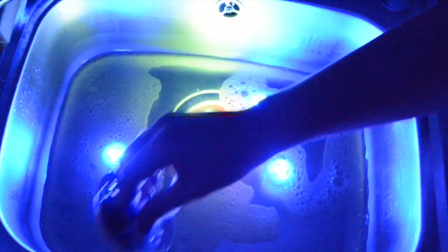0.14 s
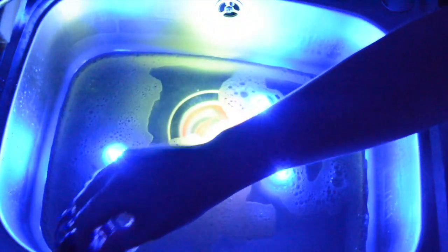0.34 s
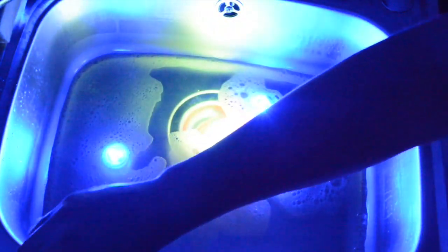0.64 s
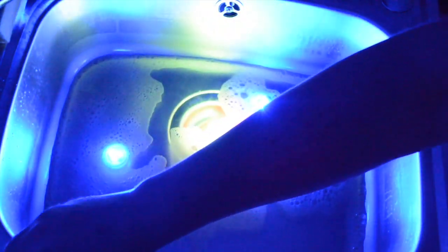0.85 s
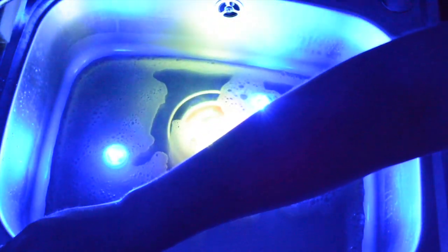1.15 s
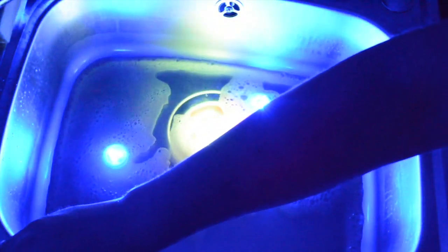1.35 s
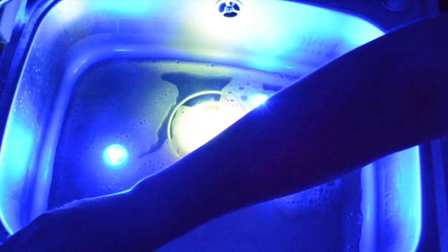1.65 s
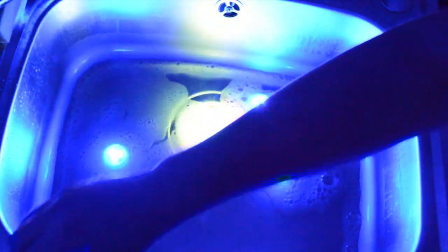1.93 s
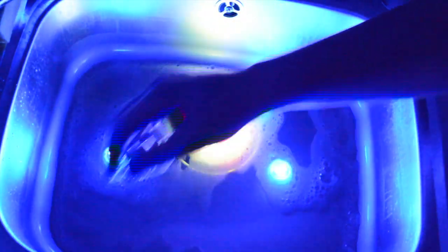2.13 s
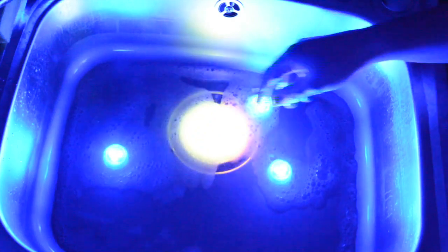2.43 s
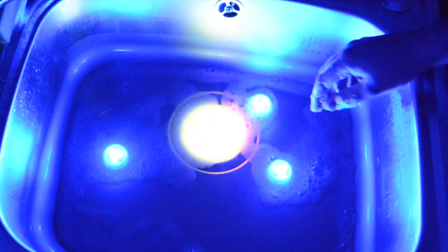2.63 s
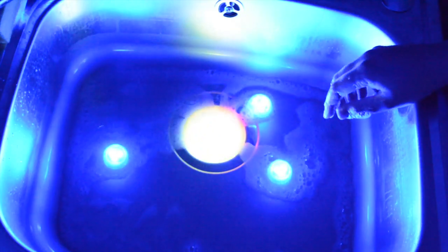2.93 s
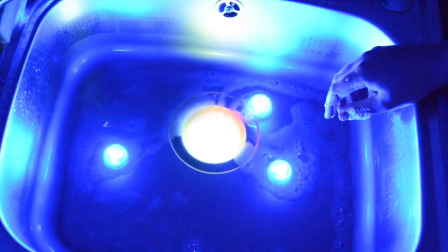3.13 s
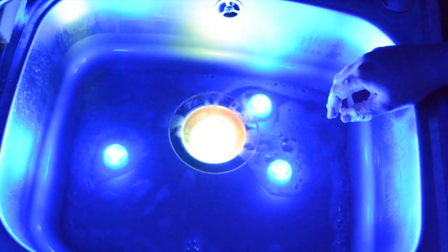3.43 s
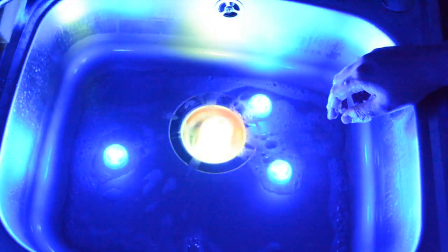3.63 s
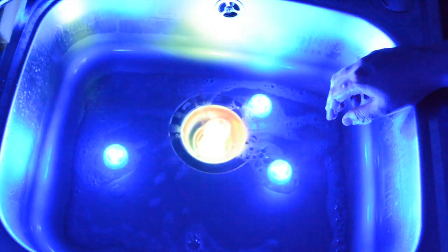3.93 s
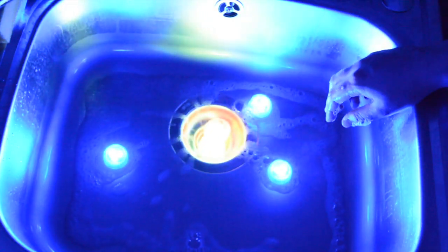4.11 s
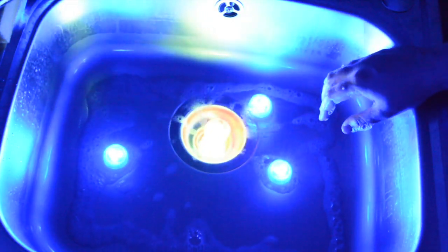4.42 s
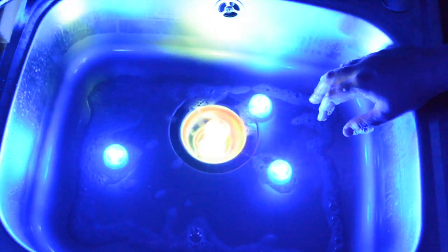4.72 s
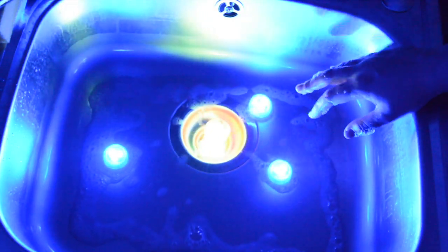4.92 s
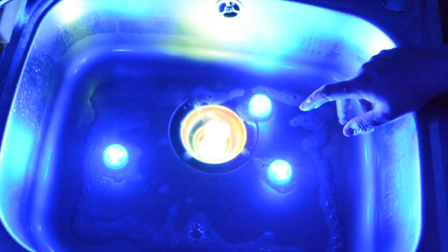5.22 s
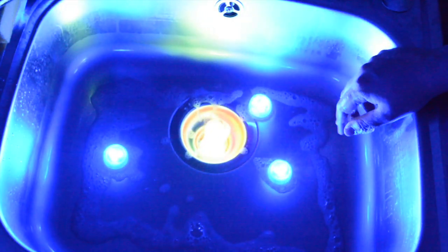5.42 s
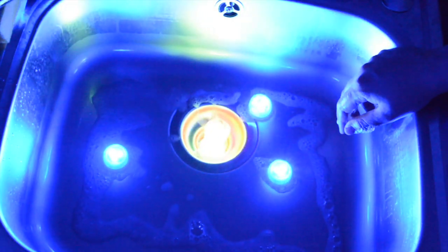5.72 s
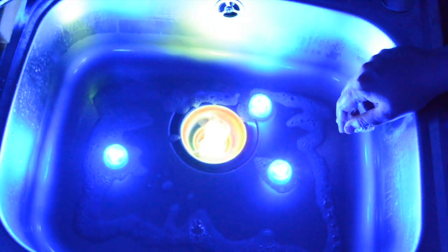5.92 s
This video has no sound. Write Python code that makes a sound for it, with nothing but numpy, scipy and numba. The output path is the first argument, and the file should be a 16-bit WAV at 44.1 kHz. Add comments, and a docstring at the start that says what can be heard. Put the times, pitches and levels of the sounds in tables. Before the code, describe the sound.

A kitchen basin empties, heard close and slightly to one side, with the sound leaning right. Burbling flow and fine spray resonate in the pipe while foam faintly fizzes. A short metallic scrape ends in a booming clank, followed later by a small double knock. As the water runs out, rapid deep glugs and splashy slurps peak, then thin into isolated gulps, tiny drips and a low final slug.

```python
"""Soapy water runs down the plughole of a steel sink, heard from close above and a little to one side.
From the start, bubbles and spray ring the air modes of the waste pipe, over a low rumble and fizzing foam.
Early on the plug scrapes and knocks on the drainer: friction and impacts excite the modes of a steel sheet.
As the basin empties the trap gulps air: each pocket is a decaying sine with filtered splashes of noise.
Late drips, ticks, sparse gulps and one deep slug of water remain over the shaped noise of the kitchen."""
import sys
import numpy as np
from scipy import signal
from scipy.fft import rfft, irfft, next_fast_len
from scipy.io import wavfile
from scipy.ndimage import uniform_filter1d, map_coordinates
from numba import njit

SR = 44100
rng = np.random.default_rng(int(sys.argv[2]) if len(sys.argv) > 2 else 0)


def output_pcm(signal):
    """Save a mono or channel-first signal as 16-bit PCM at the path in sys.argv[1].

    Samples are clipped to [-1, 1] before scaling.
    """
    pcm = np.clip(np.atleast_2d(signal).T, -1, 1) * 32767
    wavfile.write(sys.argv[1], SR, np.round(pcm).astype(np.int16))


N = 267246

# air modes over the emptied trap: (frequency [Hz], bandwidth [Hz], relative level [dB])
TRAP_MODES = [(174, 45, -0.5), (257, 49, -1.5), (362, 101, -3.5), (498, 43.4, 2), (710, 49, -10.5),
              (800, 66, -10), (1230, 86, -4), (1415, 80, -3.5), (1910, 72, -2.5), (2140, 620, -11),
              (2340, 112, -4), (2760, 58, -11.5)]
# single bubbles that stand out of the stream: (time [s], level [dB], frequency [Hz])
PLOP_EVENTS = [(0.0362, -30, 2090), (0.17, -25.5, 3230), (0.203, -30.5, 2350), (0.2843, -36.5, 2220),
               (0.58, -35, 462), (0.7235, -23.5, 2390), (1.137, -33, 461), (1.231, -32.5, 2780),
               (1.4599, -25.5, 2160), (1.4769, -26, 2094), (1.561, -28.5, 677), (1.76, -28, 490),
               (1.9021, -32, 2400), (2.131, -36.5, 505), (2.3411, -29.5, 2200), (2.46, -31.5, 485),
               (2.531, -33, 2200), (2.564, -30.5, 4050), (2.657, -33.5, 497), (2.6564, -23.5, 2240),
               (2.684, -30.5, 518), (2.7919, -34, 1950), (3.0388, -30.5, 4400), (3.0668, -27, 2240),
               (3.1488, -31, 4320)]
# delay of the left channel, a little over one sample: (weight per sample of delay)
LEFT_LAG = [0, .8, .2]
# groups of air modes: (from [Hz], to [Hz])
LOW_MODES_HZ, THROAT_MODES_HZ, HIGH_MODES_HZ = (0, 1000), (1000, 1600), (1600, 20000)


def undb(db):
    """Logarithmic level: the amplitude gain of a dB value."""
    return 10 ** (np.asarray(db) / 20)


def level(x, db):
    """Root-mean-square normalisation: scale x to an rms level in dB."""
    return x * undb(db) / np.sqrt(np.mean(x ** 2))


def curve(s, values):
    """Linear interpolation: straight lines between timed values, one value per sample."""
    return np.interp(np.arange(N) / SR, s, values)


def envelope(table):
    """Exponential envelope: gain whose dB level runs straight between rows of (time [s], level [dB])."""
    return undb(curve(*np.transpose(table)))


def butterworth(x, order, hz, kind):
    """Maximally flat filter: pass the low, high or band part of x."""
    return signal.lfilter(*signal.butter(order, hz, kind, fs=SR), x)


def resonate(x, hz, width_hz):
    """Second-order resonance: a band-pass with gain 1 at the centre."""
    return signal.lfilter(*signal.iirpeak(hz, hz / width_hz, fs=SR), x)


def decay(x, t60):
    """Exponential relaxation: each impulse of x dies by 60 dB in t60 s."""
    return signal.lfilter([1], [1, -np.exp(-np.log(1000) / (t60 * SR))], x)


def coloured(points):
    """Spectral shaping: noise of rms 1 from rows of (frequency [Hz], relative level [dB])."""
    hz, db = np.transpose(points)
    size = next_fast_len(N)
    bins_hz = np.arange(size // 2 + 1) * SR / size + 1  # 1 Hz up, to keep the logarithm finite
    gain = undb(np.interp(np.log(bins_hz), np.log(hz), db))
    spectrum = rfft(rng.standard_normal(size)) * gain
    return level(irfft(spectrum, size)[:N], 0)


def walk(rate):
    """Slow random modulation: Gaussian levels drawn rate times a second, joined by slopes."""
    k = int(SR / rate)
    steps = np.repeat(rng.standard_normal(N // k + 1), k)
    return uniform_filter1d(steps, k)[:N]


@njit
def rings(n, sr, start, hz, t60, size, glide, rise):
    """Damped oscillation: sines swell over rise s and shift pitch by the share glide while fading 60 dB."""
    out = np.zeros(n)
    for k in range(len(start)):
        length = int(t60[k] * sr)
        z, i0 = size[k] + 0j, int(start[k] * sr)
        # p turns and shrinks the phasor by one sample; turn shifts its frequency
        p = np.exp(2j * np.pi * hz[k] / sr - np.log(1000) / length)
        turn = np.exp(2j * np.pi * hz[k] * glide / sr / length)
        for i in range(i0, min(i0 + length, n)):
            out[i] += z.imag * min((i - i0) / (rise * sr), 1.)
            z *= p
            p *= turn
    return out


def bubbles(count, lo_hz, hi_hz, cycles, spread_db):
    """Bubble resonance: a swarm at random moments, each fading 60 dB in so many cycles, a few louder."""
    moment, pitch, strength = rng.random((count, 3)).T
    hz = lo_hz * (hi_hz / lo_hz) ** pitch
    size = undb(spread_db * np.minimum(-np.log(strength), 3.5))
    return level(rings(N, 1. * SR, moment * N / SR, hz, cycles / hz, size, 0.22, 0.00033), 0)


def struck(table, glide, rise):
    """Free vibration: rings from rows of (time [s], level [dB], frequency [Hz], t60 [s])."""
    s, db, hz, t60 = np.array(table, float).T.copy()
    return rings(N, 1. * SR, s, hz, np.clip(t60, .005, 1), undb(db), glide, max(rise, 1e-4))


def bursts(s, db, t60, crack):
    """Impulsive excitation: a click of size crack and a decaying puff of noise at each given moment."""
    marks = np.zeros(N)
    marks[(np.array(s) * SR).astype(int)] = undb(db)
    return crack * marks + decay(marks, t60) * rng.standard_normal(N)


def ring(modes, drive, lo_hz, hi_hz, flicker_db, fade_db=0):
    """Modal superposition: unevenly fed air modes between two limits, neighbours alternating in sign."""
    fading_rows = (10, 12)  # the modes that follow fade_db
    total = 0
    for k, (hz, width_hz, db) in enumerate(modes):
        if lo_hz < hz < hi_hz:
            feed_db = db + flicker_db * walk(21.93) + fade_db * (k in fading_rows)
            total = total + (-1) ** k * resonate(drive * undb(feed_db), hz, width_hz)
    return total


def bend(x, swing_s):
    """Time-varying delay: reading x at a wandering place makes its pitches drift up and down."""
    wander = swing_s * SR * uniform_filter1d(walk(25.), size=900)
    return map_coordinates(x, [np.arange(N) + wander], mode="mirror")


def stream():
    """Cavity resonance: bubbles churn in low pipe modes and spray in high ones, beside a basin rumble."""
    # air modes of waste pipe and plughole: (frequency [Hz], bandwidth [Hz], relative level [dB])
    pipe_modes = [(234.7, 10.7, -9.5), (349.7, 35.4, -3.5), (479.6, 42, 6.5), (518.5, 53.6, 5),
                  (704.6, 28.8, 5), (778, 46.4, -2.5), (924, 53, -10.5), (1150, 47, -0.5), (1371, 80, 0),
                  (2139, 155, -10.5), (2363, 50, -5), (2590, 200, -15), (3270, 98, -9), (4050, 126, -12),
                  (4550, 144, -14), (5608, 140, -12), (6765, 170, -19.5), (7400, 124, -19.5),
                  (8220, 530, -30), (9500, 296, -39), (11900, 800, -35), (13600, 680, -40.5)]
    # big bubbles churning in the pipe: (time [s], level [dB])
    churn_levels = [(0, -45), (1.5, -44.5), (1.9, -41.5), (2.5, -45.5), (2.78, -49.5), (3.3, -51),
                    (3.45, -51), (3.68, -48.5), (3.725, -53), (3.76, -46.5), (4.1, -50), (4.2, -65),
                    (4.5, -66.5), (4.75, -74), (6.06, -90)]
    # upper low modes, which fade as the water sinks: (time [s], level over the churn [dB])
    neck_levels = [(0, -4), (1.2, -4), (3.3, -6.5)]
    # modes of the plughole throat: (time [s], level over the churn [dB])
    throat_levels = [(0, -14), (1.2, -10), (2.2, -13), (2.7, -6), (3.3, -7), (3.5, -20), (4.2, -7.5),
                     (6.06, -14)]
    # fine spray, falling away when the basin runs empty: (time [s], level [dB])
    spray_levels = [(0, -46), (.4, -46), (1.3, -49), (2.1, -47.5), (2.7, -51), (3.24, -50.5), (3.34, -61),
                    (3.6, -66), (4.3, -72)]
    # spectrum of the basin rumble: (frequency [Hz], relative level [dB per Hz])
    rumble_spectrum = [(12, -71), (43, -6.5), (86, -0.5), (114, -1), (171, -16.5), (237, -7), (282, -20),
                       (320, -18), (420, -26.5), (700, -120)]
    # rumble of the basin: (time [s], level [dB])
    rumble_levels = [(0, -47), (.76, -42), (1.3, -42.5), (1.75, -42.5), (2.0, -39.5), (2.15, -45),
                     (2.7, -43.5), (2.8, -47.5), (3.38, -47), (3.49, -34.5), (3.6, -38.5), (3.72, -40),
                     (3.8, -42), (4.05, -35), (4.2, -46.5), (4.75, -59.5), (6.06, -74.5)]
    neck_hz, swirl_s = 600, .0002
    # two modes sink away once air breaks through the plughole
    air_in_s, air_in_db = (2.71, 2.76), -4.5

    surge, flow = walk(13.0), slaps()
    big = bubbles(count=700, lo_hz=200.6, hi_hz=1680.0, cycles=28.0, spread_db=3.0)
    churn = (big + undb(14.0) * rng.standard_normal(N)) * undb(0.67 * surge) * flow
    fine = bubbles(count=7000, lo_hz=1766.0, hi_hz=14570.0, cycles=34.0, spread_db=2.0)
    spray = (fine + undb(1.5) * rng.standard_normal(N)) * undb(0.48 * surge) * flow ** 1.15

    low = level(ring(pipe_modes, churn, LOW_MODES_HZ[0], neck_hz, 0.57), 0)
    neck = level(ring(pipe_modes, churn, neck_hz, LOW_MODES_HZ[1], 0.6), 0) * envelope(neck_levels)
    throat = level(ring(pipe_modes, churn, *THROAT_MODES_HZ, 3.6), 0) * envelope(throat_levels)
    high = ring(pipe_modes, spray, *HIGH_MODES_HZ, 1.8, curve(air_in_s, [0, air_in_db]))
    high = level(bend(high, swirl_s), 0)  # the moving water surface bends the modes
    water = envelope(churn_levels) * (low + neck + throat) + envelope(spray_levels) * high

    # partly unrelated left and right
    shared = coloured(rumble_spectrum)
    left = undb(-3.0) * (shared + 0.94 * coloured(rumble_spectrum))
    right = shared + 1.25 * coloured(rumble_spectrum)
    unsteady = undb(2.1 * surge + 1.45 * walk(5.58))
    return water, np.array([left, right]) * envelope(rumble_levels) * unsteady


def slaps():
    """Impulse and relaxation: steady flow strength jumps at each wall slap and plop, then fades quickly."""
    slaps_per_s, slap_db, spread_db, t60_s = 80, -7, 4.5, 0.027
    plop_slap_db = 27  # jump at a plop, above the plop's own table level
    moment, strength = rng.random((int(slaps_per_s * N / SR), 2)).T
    s, db, _ = np.transpose(PLOP_EVENTS)
    marks = np.zeros(N)
    marks[(moment * N).astype(int)] = undb(slap_db + spread_db * np.minimum(-np.log(strength), 2.5))
    marks[(s * SR).astype(int)] = undb(db + plop_slap_db)
    return 1 + decay(marks, t60_s)


def plops():
    """Bubble resonance: single damped sines, the small high ones dying sooner."""
    s, db, hz = np.transpose(PLOP_EVENTS)
    t60 = 0.038 * (hz / 1000) ** -0.9  # 0.038 s at 1 kHz
    return struck(np.transpose([s, db, hz, t60]), 0.011, 0.0017)


def trap():
    """Air-pocket resonance: each gulp thumps, sloshes in low trap modes and spits into upper ones."""
    # air pockets swallowed by the trap, levels relative within each column:
    # (time [s], thump level [dB], pocket frequency [Hz], splash level [dB], spit level [dB])
    gulps = [(3.28, -31, 240, -29, -54), (3.336, -24.5, 83, -39, -35), (3.409, -20.5, 98, -21.5, -32),
             (3.444, -19.5, 88, -24.5, -29), (3.462, -20, 88.0, -23.5, -33),
             (3.52, -22.5, 118.0, -26, -28.5), (3.552, -36, 155.0, -23.5, -42),
             (3.617, -21.5, 152, -25, -49), (3.639, -24, 118, -23.5, -39), (3.673, -30, 133.0, -25.5, -49),
             (3.736, -16, 157, -16.5, -45), (3.777, -22, 173.0, -22.5, -67), (3.8, -17.5, 143, -33, -35.5),
             (3.818, -21, 73, -18, -46), (3.846, -22, 138, -20.5, -42), (3.879, -26, 226.0, -34.0, -43),
             (3.898, -22.5, 191.0, -26, -45), (3.929, -23.5, 170, -28.5, -41),
             (3.951, -24, 154, -29, -38.5), (3.985, -27, 151.0, -21, -34.0), (4.008, -18, 173.0, -18, -43),
             (4.034, -11.5, 168, -22.5, -35), (4.049, -15, 183, -37, -31), (4.09, -20.5, 142, -47, -43),
             (4.11, -30, 72.4, -26.5, -44), (4.134, -21.5, 115, -47.5, -43),
             (4.241, -21.5, 140, -28.5, -34), (4.26, -22, 122, -35, -34), (4.354, -26, 241, -27.5, -40.0),
             (4.385, -25, 205, -36, -43), (4.406, -25, 138, -35, -41), (4.438, -30, 110, -38, -52),
             (4.502, -43, 163.0, -47, -39.5), (4.635, -51, 104.0, -42.5, -40), (4.81, -37, 222, -41, -47),
             (4.84, -37.5, 235, -43, -48), (5.037, -48, 254, -47, -59), (5.29, -70, 230, -55.5, -48),
             (5.409, -32, 102, -61, -65), (5.498, -45, 74.0, -47.5, -64), (5.52, -38, 247, -71.5, -50.5),
             (5.814, -56, 81, -49, -55), (5.853, -44.5, 217, -61, -50)]
    thump_t60_s, wobble_s = 0.084, 0.00031
    slosh_db, slosh_t60_s = -16, 0.21  # water washing about after each gulp
    s, db, hz, splash_db, spit_db = np.transpose(gulps)

    def wash(burst_db, t60, crack):
        """Impulsive excitation: a splash followed by a weaker, longer, unsteady slosh."""
        splash = bursts(s, burst_db, t60, crack)
        slosh = bursts(s, burst_db + slosh_db, slosh_t60_s, 0)
        return splash + slosh * undb(2.9 * walk(60.))

    slap = ring(TRAP_MODES, wash(splash_db, 0.044, 8.0), *LOW_MODES_HZ, 1.0)
    slap = butterworth(slap, 2, 1500., "low")
    throat = ring(TRAP_MODES, wash((splash_db + spit_db) / 2, 0.087, 1.3), *THROAT_MODES_HZ, 3.4)
    spit = ring(TRAP_MODES, wash(spit_db, 0.058, 1.6), *HIGH_MODES_HZ, 0.71)
    thump = struck(np.transpose([s, db, hz, thump_t60_s + 0 * s]), -0.073, 0.0047)
    # the moving water surface bends the lower modes
    return bend(thump + undb(16.0) * slap + undb(3.0) * throat, wobble_s) + undb(8.5) * spit


def trickle():
    """Cavity resonance: small drops and noise splash into the upper modes of the emptied trap."""
    # last trickle: (time [s], level [dB])
    trickle_levels = [(3.2, -93), (3.35, -84), (4.1, -67), (4.2, -66.5), (4.4, -66), (4.9, -75), (5.2, -84),
                      (6.06, -92)]
    drops = bubbles(count=1200, lo_hz=900., hi_hz=4150., cycles=7., spread_db=3.)
    drive = drops + undb(2.0) * rng.standard_normal(N)
    return level(ring(TRAP_MODES, drive, 790., HIGH_MODES_HZ[1], 1.8), 0) * envelope(trickle_levels)


def drips():
    """Damped oscillation: each late drip is one dying sine of slightly rising pitch."""
    # late drips: (time [s], level [dB], frequency [Hz], t60 [s])
    drip_events = [(4.641, -61, 2770, 0.14), (4.813, -63, 2750, 0.1), (4.845, -64, 2740, .18),
                   (4.92, -69, 1940, .12), (5.203, -56, 2290, .03), (5.296, -66, 1926, .25),
                   (5.822, -64, 1175, 0.45)]
    return struck(drip_events, 0.004, 0.00085)


def slug():
    """Amplitude modulation: one late slug of water is deep noise with attack, sagging hold and release."""
    # spectrum of the slug: (frequency [Hz], relative level [dB per Hz])
    slug_spectrum = [(12, -24), (25, 5.5), (45, 0), (70, -6.5), (120, -16), (250, -13.5), (400, -37),
                     (700, -75)]
    start_s, attack_s, hold_s, release_s = 5.395, 0.038, 0.263, 0.033
    slug_db, sag_db = -40.5, -12.5
    corners_s = start_s + np.cumsum([0, attack_s, hold_s, release_s])
    shape = curve(corners_s, undb(slug_db) * np.array([0, 1, undb(sag_db), 0]))
    # partly unrelated left and right
    shared = coloured(slug_spectrum)
    left = 0.49 * shared + 0.74 * coloured(slug_spectrum)
    right = 1.1 * shared + 1.0 * coloured(slug_spectrum)
    return shape * undb(2.0 * walk(28.0)) * np.array([left, right])


def plug():
    """Forced plate vibration: blows and dragging ring the drainer sheet, with clatter, rasp and boom."""
    # the plug dragged over the steel: (time [s], relative level [dB])
    scrape_levels = [(.768, -62), (.784, -47.5), (.796, -32.5), (.83, -40), (.862, -36), (.93, -43.5),
                     (.968, -48), (.98, -77.5)]
    # the plug set down on the drainer: (time [s], relative level [dB], contact brightness [Hz])
    knocks = [(0.9761, -22.5, 2830), (0.9874, -23.5, 2600), (0.997, -31.5, 1800), (1.008, -29, 1800),
              (1.044, -31.5, 1800), (1.581, -28.5, 1400), (1.586, -29, 1390), (1.606, -33, 1300),
              (1.619, -35, 1490)]
    # modes of the drainer sheet: (frequency [Hz], relative level [dB], t60 [s])
    sheet_modes = [(724, -5, 0.13), (834, -10, 0.041), (930, 5, 0.055), (1030, 11, 0.014),
                   (1145, 2.5, 0.049), (1238, 2, 0.04), (1346, -6, 0.093), (1400, -2, 0.2),
                   (1500, -6.5, 0.097), (1695, -14, 0.041), (2110, -11, .04), (2433, 2, 0.03)]
    knock_low_hz = 680  # blows give little below this
    boom_s, boom_db, boom_t60_s, boom_band_hz = .99, -17.5, 0.32, (169.4, 910)

    drag = envelope(scrape_levels) * undb(2.2 * walk(150.)) * rng.standard_normal(N)
    blows = np.zeros(N)
    for s, db, hz in knocks:
        # a blunter contact pushes longer and so gives less treble
        blows += butterworth(bursts([s], db, 0.027, crack=6.9), 2, (knock_low_hz, hz), "band")
    s, db, hz = np.transpose(knocks)
    clatter = bursts(s, db + 31.0 * np.log10(hz / hz[0]), 0.13, crack=1.5)  # brighter blows clatter more
    clatter = butterworth(clatter, 1, (3000., 8000.), "band")

    drive = undb(6.5) * blows + drag
    sheet = np.zeros(N)
    for hz, db, t60 in sheet_modes:
        width_hz = np.log(1000) / np.pi / t60
        sheet += undb(db) * np.sqrt(t60) * resonate(drive, hz, width_hz)
    # the basin booms under the heaviest blows
    boom = butterworth(bursts([boom_s], boom_db, boom_t60_s, crack=0), 2, boom_band_hz, "band")
    rasp = butterworth(drag, 1, 6000., "high")
    return boom + undb(18.0) * sheet + undb(-29.0) * rasp + undb(-4.0) * blows + undb(-25.5) * clatter


def suds():
    """Superposed film bursts: foam fizzes in tiny bright pops and hiss; a few dry ticks stand out."""
    # foam fizzing on the steel: (time [s], level [dB])
    fizz_levels = [(0, -70), (3.1, -68), (3.4, -69.5), (4.3, -70), (4.7, -75), (6.06, -92)]
    # faint dry ticks: (time [s], relative level [dB])
    tick_events = [(0.228, -50), (0.7926, -53), (1.2366, -49.5), (3.2, -47), (4.235, -54), (4.501, -57),
                   (4.6394, -60), (5.056, -62), (5.128, -62), (5.203, -61), (5.581, -55.5), (5.8194, -58),
                   (6.04, -61)]
    pops = bubbles(count=1500, lo_hz=4330.0, hi_hz=13000.0, cycles=2.6, spread_db=2.5)
    hiss = butterworth(rng.standard_normal(N), 2, 4500., "high")
    fizz = envelope(fizz_levels) * level(pops + undb(-3.5) * hiss, 0)
    s, db = np.transpose(tick_events)
    ticks = butterworth(bursts(s, db, 0.034, crack=1.4), 2, (1300., 10000.), "band")
    return fizz + undb(-0.5) * ticks


def kitchen():
    """Diffuse field: a hush of shaped noise flickers a little, largely unrelated left and right."""
    # spectrum of the hush: (frequency [Hz], relative level [dB per Hz])
    hush_spectrum = [(15, -33.5), (25, 14), (160, -9), (253, 4), (313, -27.5), (368, -4), (433, -15.5),
                     (537, -11.5), (582, -17.5), (782, -23), (1270, -26), (1950, -25.5), (3080, -24),
                     (15500, -34)]
    hush_db = -55
    shared = coloured(hush_spectrum)
    left = undb(-3.0) * (0.7 * signal.lfilter(LEFT_LAG, 1, shared) + coloured(hush_spectrum))
    right = 0.91 * shared + coloured(hush_spectrum)
    return level(np.array([left, right]) * undb(0.55 * walk(21.0)), hush_db)


def place(x, pan_db, wet_db, t60):
    """Precedence and reverberation: direct sound comes first on the right; each side has its own echoes."""
    echo_low_hz = 490  # echoes are weak below this
    t = np.arange(int(t60 * SR)) / SR
    fade = np.exp(-np.log(1000) * t / t60) * np.minimum(t / 0.0054, 1)
    echoes = rng.standard_normal((2, len(t))) * fade  # basin and walls
    echoes *= undb(wet_db) / np.sqrt(np.sum(echoes ** 2, axis=1, keepdims=True))
    feed = butterworth(x, 1, echo_low_hz, "high")
    wet = signal.fftconvolve(feed[None], echoes, axes=1)[:, :N]
    direct = np.array([signal.lfilter(LEFT_LAG, 1, x), x])
    return (direct + wet) * undb([[pan_db / 2], [-pan_db / 2]])


def scene():
    """Linear superposition: water at the plughole, plug on the drainer, foam and the room around."""
    water, rumble = stream()
    water = water + trap() + trickle() + plops() + drips()
    sound = place(water, pan_db=-5.5, wet_db=-3.5, t60=.1) + rumble + slug()
    sound = sound + place(suds(), pan_db=-2.0, wet_db=3.1, t60=.05)
    sound = sound + place(plug(), pan_db=-7.0, wet_db=-0.905, t60=.25)
    return sound + kitchen()


def record(dry):
    """Band limitation: a steep elliptic low-pass cuts the top of the treble."""
    top_hz = 15720
    return signal.sosfilt(signal.ellip(14, .3, 80, top_hz, fs=SR, output="sos"), dry)


dry = scene()
out = record(dry)
output_pcm(out)
```